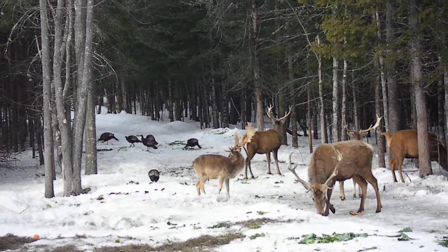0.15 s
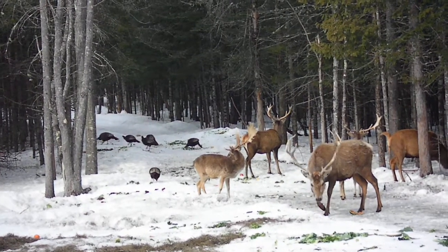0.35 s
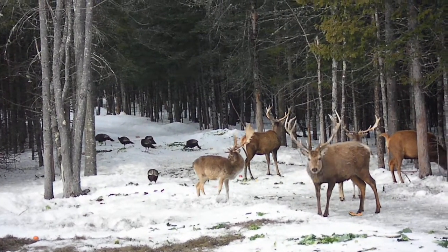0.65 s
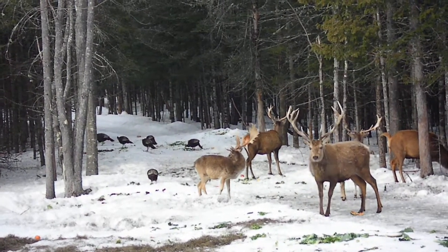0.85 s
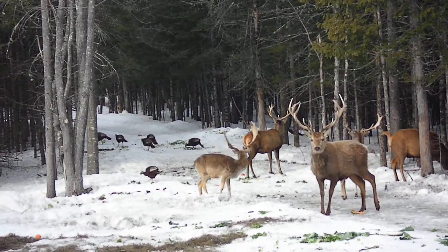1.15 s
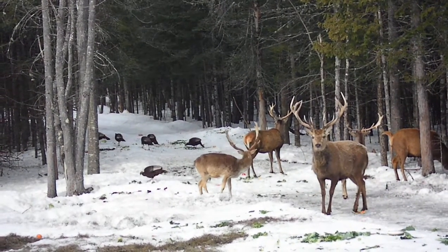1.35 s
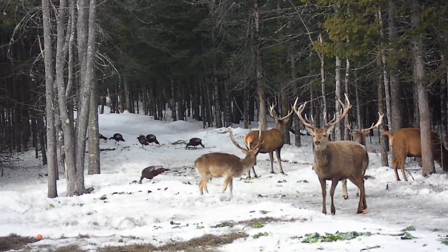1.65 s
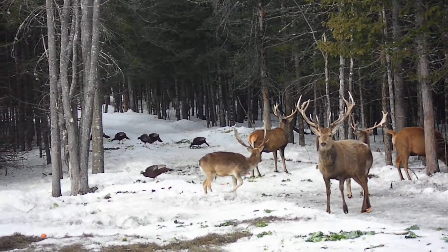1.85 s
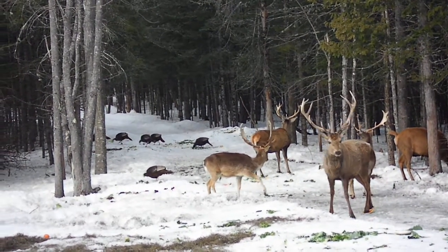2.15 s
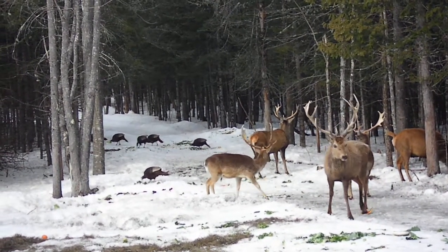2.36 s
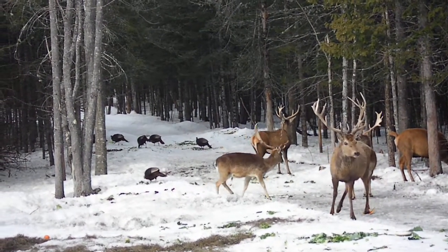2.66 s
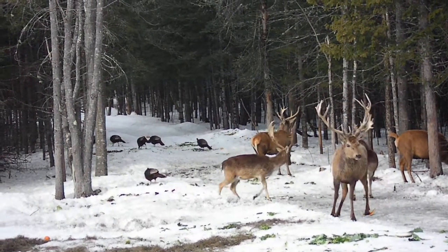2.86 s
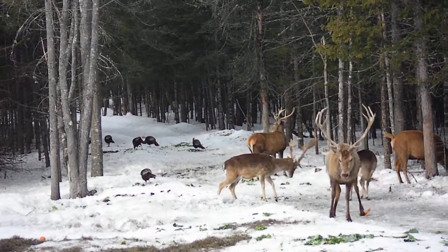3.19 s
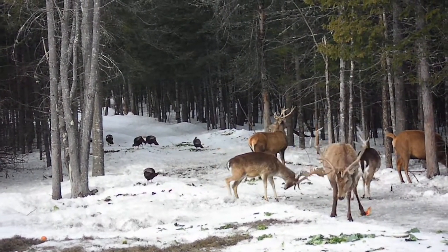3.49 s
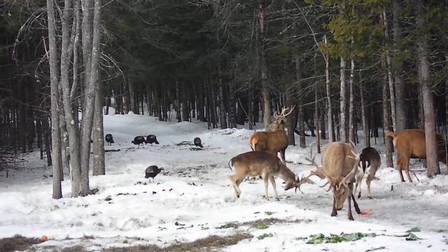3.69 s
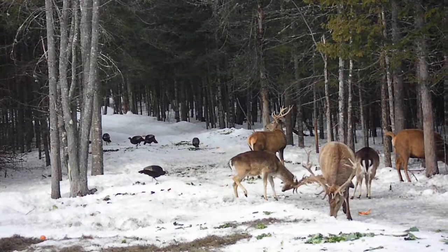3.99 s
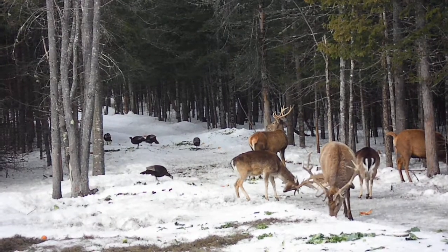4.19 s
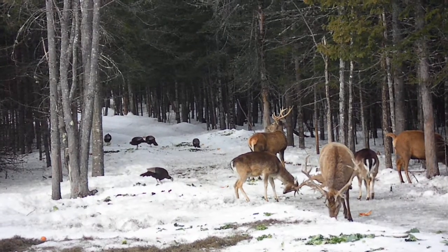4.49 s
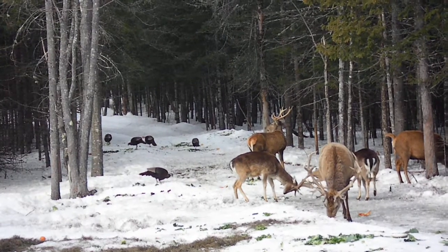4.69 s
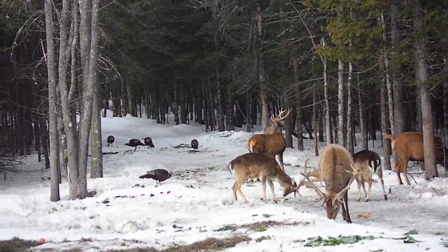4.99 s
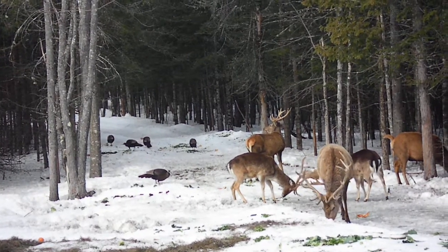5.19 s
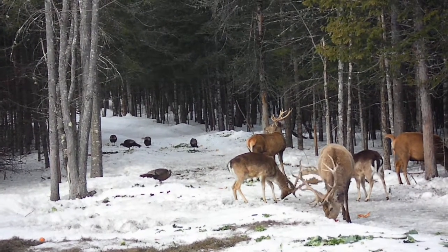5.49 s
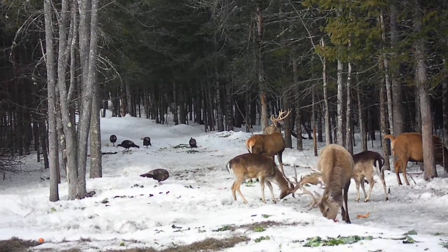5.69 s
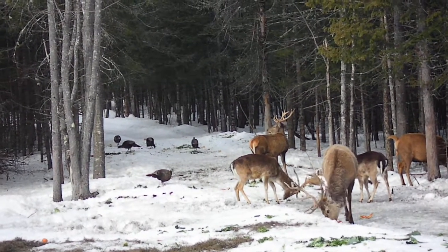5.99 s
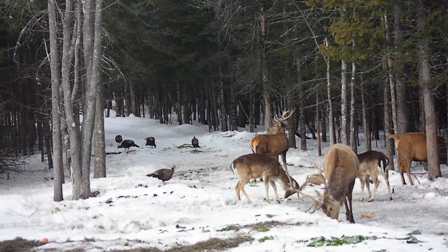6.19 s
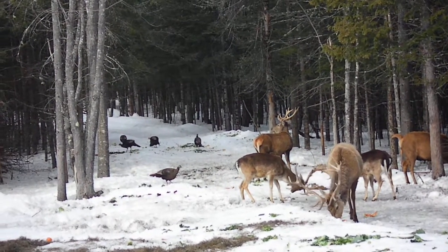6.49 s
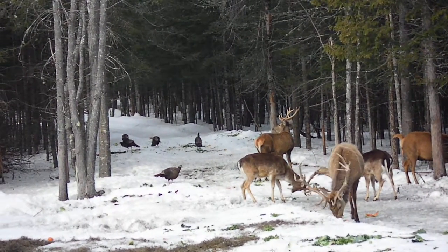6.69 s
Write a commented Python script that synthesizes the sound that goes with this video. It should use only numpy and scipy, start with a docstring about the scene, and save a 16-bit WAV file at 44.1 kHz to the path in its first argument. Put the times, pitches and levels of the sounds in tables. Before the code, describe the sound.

A calm snowy clearing beside woods, heard by an outdoor camera microphone: steady faint hiss, low rumble and a wavering distant engine hum, with barely audible ticking from animals farther back. From 0.2 to 0.75 seconds hooves crunch lightly in frozen crust, with crisp snaps near 0.5 to 0.7. A soft dull microphone bump comes at 1.03. More short crunches fall between 1.3 and 1.8, with a bright crack at 1.57, then faint steps and small snaps until 3.2. At 3.75 antlers meet: dry, hollow, bony clacks rattle quickly until about 4.2, strongest at 3.9, echoing diffusely off trunks. Sparse taps and a crunch follow at 4.35 to 5.2. At 5.5 a rasping slide bursts into the loudest hard clatter, lasting until 5.9, while the hum swells briefly. Weak taps at 6.3, 6.6 and 6.8 end it, with the hum rising again.

```python
"""A snowy clearing at the edge of a conifer wood, where deer feed.
Hooves crunch the frozen crust (crumbling grains) and snap brittle pieces (short resonant crackles).
Two stags knock and rub antlers: noise bursts and slips ring tine resonances; the trunks scatter each clack.
A far engine hums (resonated noise) over a low rumble and a faint steady hiss (coloured noise).
The microphone is bumped once: a few smooth pressure swings."""
import sys
import numpy as np
from scipy import signal
from scipy.fft import rfft, irfft, next_fast_len
from scipy.io import wavfile

SR = 44100
rng = np.random.default_rng(int(sys.argv[2]) if len(sys.argv) > 2 else 0)


def log_audio(samples):
    """Write samples as a 16-bit WAV file to the path given in sys.argv[1]."""
    # one column per channel
    frames = np.atleast_2d(samples).T
    # limit to full scale, then quantise
    limited = np.clip(frames, -1, 1)
    pcm = np.round(limited * 32767).astype(np.int16)
    wavfile.write(sys.argv[1], SR, pcm)


N = 302085
TIME_S = np.arange(N) / SR

# still air and recorder hiss, spectrum: [f/Hz, density/dB per Hz]
HISS_SPECTRUM = [(100, -4.5), (450, 1.5), (950, -2.5), (1600, -7.5), (5000, -11), (7000, -13), (9500, -13),
                 (11500, -18), (16000, -20)]
# far engine's hum before its gain: [t/s, level/dB]
ENGINE_SWELL = [(0.0, -54), (2.35, -57), (5.04, -54), (5.46, -46.5), (5.67, -52), (5.76, -39.5), (5.8, -50),
                (6.22, -54), (6.85, -42)]
# low rumble, spectrum: [f/Hz, density/dB per Hz]
RUMBLE_SPECTRUM = [(20, -30), (45, -19), (62, -6), (80, -1.5), (110, 0.5), (150, -6), (210, 1.5), (330, -3),
                   (450, -13), (800, -34.5)]
# echo of the wood, decay: [f/Hz, t60/s]; a negative t60 makes the band grow
WOOD_DECAY = [(300, 1.5), (1200, 1.7), (3000, 0.9), (6000, 0.75), (12000, -1.5)]
# echo of the wood, strength: [f/Hz, level/dB]
WOOD_STRENGTH = [(300, -9), (1200, -4.5), (3000, -5.5), (6000, -5.5), (12000, -15.5)]
# hooves pressing into the crust: [t/s, mid-band level/dB, length/s]
HOOF_STEPS = [(0.166, -63, .04), (0.367, -55, 0.035), (0.556, -51, 0.04), (0.665, -53, 0.098),
              (0.734, -48, 0.014), (1.3205, -47, 0.016), (1.518, -54, 0.016), (1.565, -53.5, 0.035),
              (1.638, -49.5, 0.074), (1.81, -50.5, 0.011), (2.231, -65, 0.044), (2.8, -59.5, 0.043),
              (2.987, -62, 0.092), (3.188, -59, 0.14), (4.356, -54.5, 0.084), (5.201, -51, 0.031)]
# crushed snow, spectrum: [f/Hz, density/dB per Hz]
SNOW_SPECTRUM = [(200, -26), (600, -0.5), (1200, -2), (4500, -0.5), (7000, 1.5), (10000, 0), (12000, -15.5),
                 (16000, -14)]
# brittle snaps of ice and feed: [t/s, peak level/dB, f/Hz]
BRITTLE_SNAPS = [(0.4875, -23.5, 4940), (0.5694, -30, 2000), (0.6908, -27.5, 4570), (1.5713, -23.5, 5640),
                 (2.9332, -42.5, 5100), (3.2257, -35, 3400), (4.8209, -35.5, 2270), (5.061, -36.5, 4400),
                 (6.548, -35, 11500)]
# harder snaps are broader: [peak level/dB, width/f]
SNAP_BREADTH = [(-34, 0.12), (-28, 0.58)]
# soft bumps on the microphone: [t/s, peak level/dB, f/Hz]
MIC_BUMPS = [(1.02, -45, 69.6), (1.0298, -28.5, 131), (1.046, -47, 45), (1.067, -40, 88)]
# antler on antler: [t/s, mid-band level/dB, chatter t60/s, struck tine f/Hz]
ANTLER_KNOCKS = [(3.7553, -31.5, .085, 1700), (3.774, -35, 0.038, 480), (3.8887, -24.5, .038, 3050),
                 (3.899, -35.5, 0.053, 1480), (3.923, -34, 0.046, 2950), (3.983, -28.5, 0.044, 2060),
                 (4.0165, -40, 0.054, 2640), (4.0359, -35.5, 0.05, 1000), (4.12, -39, 0.02, 2750),
                 (4.1305, -41.5, 0.053, 1460), (4.1492, -40.5, .08, 1000), (4.1714, -40, 0.05, 1020),
                 (4.1835, -32, 0.032, 2700), (4.3485, -45, 0.046, 975), (4.361, -44.5, .03, 2450),
                 (4.6537, -38, 0.018, 3340), (4.9661, -37.5, 0.039, 1650), (5.5003, -37.5, 0.13, 1750),
                 (5.5505, -21.5, 0.067, 2560), (5.5626, -20, 0.0089, 9700), (5.604, -26.5, 0.055, 3830),
                 (5.6536, -22.5, 0.011, 2500), (5.7663, -25, 0.024, 5300), (5.836, -31, 0.044, 3900),
                 (5.877, -37, 0.043, 3300), (6.2927, -48.5, 0.028, 3070), (6.58, -44, 0.059, 2410),
                 (6.7877, -40.5, 0.027, 2780)]
# resonances of the antlers: [f/Hz, width/Hz, level/dB]
TINE_MODES = [(477, 80, -18), (814, 79, -16), (1010, 32, 4), (1280, 51, 2), (1460, 41, 6), (1676, 134, 2),
              (1725, 61, 6), (2060, 36, 12), (2415, 360, 0.5), (2453, 120, 12), (2820, 290, -0.5),
              (3162, 48, 13), (3830, 120, 0.5), (4540, 92, -17), (4710, 70, -1), (5570, 370, 12.5),
              (8740, 1800, -0.5), (9700, 310, 5)]
# dry antler contact, spectrum: [f/Hz, density/dB per Hz]
CONTACT_SPECTRUM = [(200, -19), (450, -6.5), (1200, -1.5), (3000, -3.5), (4200, -2.5), (6000, -6.5),
                    (7000, 0.5), (10300, -7), (11800, -20), (16000, -16)]
# bass, then treble of a knock: [level/dB re mid, slope/dB per dB of force, slope/dB per doubling of t60]
BASS_OF_KNOCK = (-10.0, -0.26, 6.0)
TREBLE_OF_KNOCK = (-12.5, -0.098, -4.0)


def from_db(db):
    """Decibels to gain."""
    return 10 ** (np.asarray(db) / 20)


def rms_one(x):
    """Scale to unit power."""
    return x / np.sqrt(np.mean(x ** 2) + 1e-20)


def at_hz(points, hz):
    """Read a table on a log-frequency axis."""
    points = np.array(points)
    return np.interp(np.log(np.maximum(hz, 1)), np.log(points[:, 0]), points[:, 1])


def coloured(x, spectrum):
    """Filter a steady noise by a spectrum; rms 1."""
    size = next_fast_len(len(x))
    hz = np.arange(size // 2 + 1) * SR / size
    shaped = rfft(x, size) * from_db(at_hz(spectrum, hz))
    return rms_one(irfft(shaped, size)[:len(x)])


def band(x, low_hz, high_hz):
    """Butterworth band-pass."""
    sos = signal.butter(2, [low_hz, min(high_hz, SR / 2 - 1)], "band", fs=SR, output="sos")
    return signal.sosfilt(sos, x + 1e-18)


def resonance(x, hz, width_hz):
    """Two-pole resonance with gain 1 on top."""
    r = np.exp(-np.pi * width_hz / SR)
    zeros = np.array([1, 0, -1]) * (1 - r * r) / 2
    poles = [1, -2 * r * np.cos(2 * np.pi * hz / SR), r * r]
    return signal.lfilter(zeros, poles, x + 1e-18)


def grains(per_s, spread_db):
    """Random tiny fractures of uneven size."""
    sizes = from_db(spread_db * np.minimum(rng.exponential(1, N), 4))
    return sizes * rng.choice([-1, 1], N) * (rng.random(N) < per_s / SR)


def registers(x, splits_hz):
    """Bass, middle and treble of a texture, each at rms 1."""
    size = next_fast_len(N)
    spectrum = rfft(x, size)
    register = np.digitize(np.fft.rfftfreq(size, 1 / SR), splits_hz)
    return np.array([rms_one(irfft(spectrum * (register == k), size)[:N]) for k in range(3)])


def add(out, s, sound):
    """Mix a short sound in at time s."""
    start = max(round(s * SR), 0)
    out[start:start + len(sound)] += sound[:max(N - start, 0)]


def burst(texture, s, db, bass_db, treble_db, envelope):
    """A stretch of texture with its own tone balance (dB re mid), under an envelope."""
    piece = np.take(texture, round(s * SR) + np.arange(len(envelope)), axis=1, mode="wrap")
    power = np.average(piece ** 2, axis=1, weights=envelope ** 2 + 1e-12)
    gains = from_db(db + np.array([bass_db, 0, treble_db])) / np.sqrt(power)
    return gains @ piece * envelope


def hiss(level_db=-56.5):
    """Steady coloured noise of still air and recorder."""
    return from_db(level_db) * coloured(rng.standard_normal(N), HISS_SPECTRUM)


def engine(hum_hz=253, hum_width_hz=27, hum_gain_db=-1.2, drone_hz=150, drone_width_hz=80,
           drone_db=-56.5, drone_follows=0.67, rumble_db=-57, rumble_follows=0.14):
    """Twice-resonated noise as wavering hum and drone over a rumble; both follow a share of the hum's swing."""
    s, db = np.transpose(ENGINE_SWELL)
    hum_db = np.interp(TIME_S, s, db)
    swell_db = hum_db - db.mean()
    noise = rng.standard_normal((3, N))
    hum = rms_one(resonance(resonance(noise[0], hum_hz, hum_width_hz), hum_hz, hum_width_hz))
    drone = rms_one(resonance(resonance(noise[1], drone_hz, drone_width_hz), drone_hz, drone_width_hz))
    rumble = coloured(noise[2], RUMBLE_SPECTRUM)
    return (hum * from_db(hum_gain_db + hum_db)
            + drone * from_db(drone_db + drone_follows * swell_db)
            + rumble * from_db(rumble_db + rumble_follows * swell_db))


def herd(ticks_per_s=60, level_db=-70, spread_db=2.8):
    """Faint ticking of the animals farther back, shifting and nibbling."""
    return from_db(level_db) * rms_one(band(grains(ticks_per_s, spread_db), 2500, 9400))


def wood(x, near_db=13.0, near_t60_s=0.25, build_s=0.049):
    """Dense trunk echoes, near ones then a long tail; the top two bands instead swell up to the 2 s cut."""
    t, response = TIME_S[:2 * SR], 0
    edges_hz = 200 * 2 ** (np.arange(11) * 2 / 3)
    echoes = rng.standard_normal((2, len(t)))
    for k, (low, high) in enumerate(zip(edges_hz, edges_hz[1:])):
        hz = np.sqrt(low * high)
        fade = from_db(-60 * t / at_hz(WOOD_DECAY, hz)) + from_db(near_db - 60 * t / near_t60_s)
        tail = band(echoes[k % 2] * fade * (1 - np.exp(-t / build_s)), low, high)
        # equal energy per Hz before the strength table
        flat = np.sqrt(2 * (high - low) / SR / np.sum(tail ** 2))
        response = response + from_db(at_hz(WOOD_STRENGTH, hz)) * tail * flat
    return signal.fftconvolve(x, response)[:N]


def steps(grains_per_s=1800, rise_share=0.12, hold_share=0.71, release_t60_s=0.062,
          usual_db=-53, bass_db=-5.5, usual_treble_db=0.3, fineness_db_per_db=0.24):
    """Crust crumbles while the hoof sinks, then crumbs settle; light steps break only the finest crystals."""
    texture = registers(coloured(grains(grains_per_s, spread_db=3.0), SNOW_SPECTRUM), splits_hz=[1800, 6000])
    out, t = np.zeros(N), TIME_S[:SR // 4]
    for s, db, length_s in HOOF_STEPS:
        rise = np.minimum(t / (rise_share * length_s), 1)
        release = from_db(-60 * np.maximum(t - hold_share * length_s, 0) / release_t60_s)
        treble_db = usual_treble_db + fineness_db_per_db * (usual_db - db)
        add(out, s, burst(texture, s, db, bass_db, treble_db, rise * release))
    return out


def snaps(t60_s=0.016, splinter_db=-17, delay_s=0.0013):
    """A brittle piece breaks: a few milliseconds of crackle round its own pitch."""
    out, t = np.zeros(N), TIME_S[:SR // 20]
    for s, db, hz in BRITTLE_SNAPS:
        splinter = rng.standard_normal(len(t)) * from_db(-60 * t / t60_s)
        width = np.interp(db, *np.transpose(SNAP_BREADTH))
        crack = resonance(splinter, hz, width * hz) + from_db(splinter_db) * splinter
        crack = band(crack, 0.35 * hz, 12800)   # small pieces radiate no bass
        add(out, s + delay_s, from_db(db) * crack / np.abs(crack).max())
    return out


def bumps():
    """One dull swing of pressure per touch."""
    out = np.zeros(N)
    for s, db, hz in MIC_BUMPS:
        swing = np.minimum((np.pi * hz * (TIME_S - s)) ** 2, 50)
        out += from_db(db) * (1 - 2 * swing) * np.exp(-swing)
    return out


def near_tine(hz, emphasis_db, reach=0.18):
    """Modes close to the pitch of the touched tine ring most: dB per mode."""
    distance = np.log(np.array(TINE_MODES)[:, 0] / hz) / reach
    return emphasis_db * np.exp(-distance ** 2)


def antler_ring(x, strengths_db, detune=1):
    """The modes of the tines, each shaken with a strength of its own, in alternating sign."""
    out = np.zeros(len(x))
    for k, (hz, width_hz, db) in enumerate(TINE_MODES):
        out += (-1) ** k * from_db(db + strengths_db[k]) * resonance(x, hz * detune, width_hz)
    return out


def strikes(rebound_s=0.012, spread_octaves=0.4, loss_db=19, rebound_t60_s=0.05):
    """Antlers spring apart and touch again: every knock and its softer rebound, in knock columns."""
    delays_s = rebound_s * 2 ** (spread_octaves * rng.standard_normal(len(ANTLER_KNOCKS)))
    rows = []
    for (s, db, t60_s, hz), delay_s in zip(ANTLER_KNOCKS, delays_s):
        rows += [(s, db, t60_s, hz), (s + delay_s, db - loss_db, rebound_t60_s, hz)]
    return rows


def knock_tone(db, t60_s, usual_db=-35, usual_t60_s=0.04):
    """Force thins the bass and slightly dulls; longer chatter is hollower: bass and treble, dB re mid."""
    force_db, doublings = db - usual_db, np.log2(t60_s / usual_t60_s)
    return [usual + per_db * force_db + per_doubling * doublings
            for usual, per_db, per_doubling in (BASS_OF_KNOCK, TREBLE_OF_KNOCK)]


def knocks(crack_db=0.5, crack_t60_s=0.005, ring_db=-1.5, tine_db=9, uneven_db=7.5, detune=0.028):
    """Each knock is a hard crack and a brief chatter of the two beams, which sets the tines ringing."""
    texture = registers(coloured(rng.standard_normal(N), CONTACT_SPECTRUM), splits_hz=[1200, 6000])
    out, t = np.zeros(N), TIME_S[:SR // 7]
    for s, db, t60_s, hz in strikes():
        luck = rng.standard_normal(len(TINE_MODES) + 1)
        envelope = from_db(-60 * t / t60_s) + from_db(crack_db - 60 * t / crack_t60_s)
        contact = burst(texture, s, db, *knock_tone(db, t60_s), envelope)
        # the grip of the other antler shifts the modes a little from blow to blow
        strengths_db = near_tine(hz, tine_db) + uneven_db * luck[1:]
        ring = antler_ring(contact, strengths_db, 1 + detune * luck[0])
        # the tines take up a set share of the energy of the blow
        add(out, s, contact + from_db(ring_db) * np.std(contact) * rms_one(ring))
    return band(out, 305, 11000)


def slide(start_s=5.485, length_s=0.045, start_db=-44, swell_db_per_s=339, attack_db_per_s=1200,
          release_db_per_s=3700, slips_per_s=800, top_hz=3900, ring_db=1.5, tine_hz=1800, tine_db=8.5):
    """Rough tines catch and slip many times as they slide, ever harder, and rasp in their own resonances."""
    t = TIME_S - start_s
    pressure_db = (start_db + attack_db_per_s * np.minimum(t, 0) + swell_db_per_s * np.clip(t, 0, length_s)
                   - release_db_per_s * np.maximum(t - length_s, 0))
    slips = rms_one(band(coloured(grains(slips_per_s, spread_db=0.5), CONTACT_SPECTRUM), 960, top_hz))
    rasp = slips * from_db(np.maximum(pressure_db, -149.5))
    return rasp + antler_ring(rasp, ring_db + near_tine(tine_hz, tine_db, reach=0.26))


def scene(hooves_echo_db=-1.0, snaps_echo_db=-7.0):
    """Antlers and hooves in the clearing with their echo, over the steady background."""
    background = hiss() + engine()
    hooves = herd() + steps()
    ice = snaps()
    antlers = knocks() + slide()
    echo = wood(antlers + from_db(hooves_echo_db) * hooves + from_db(snaps_echo_db) * ice)
    return (background + hooves + ice + bumps() + antlers + echo)[None]


def record(dry, notch_hz=7870, notch_width_hz=820, cutoff_hz=15900):
    """The camera has a narrow notch in the treble (its resonance subtracted) and a steep top cut."""
    notched = dry - resonance(dry, notch_hz, notch_width_hz)
    return signal.sosfilt(signal.ellip(12, .1, 80, cutoff_hz, fs=SR, output="sos"), notched)


dry = scene()
out = record(dry)
log_audio(out)
```